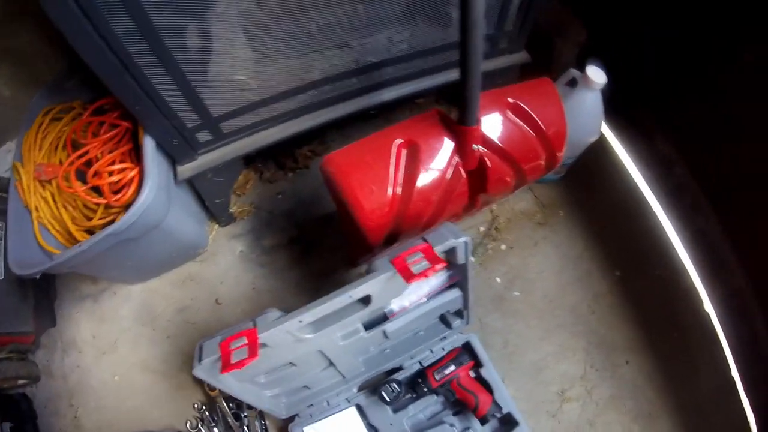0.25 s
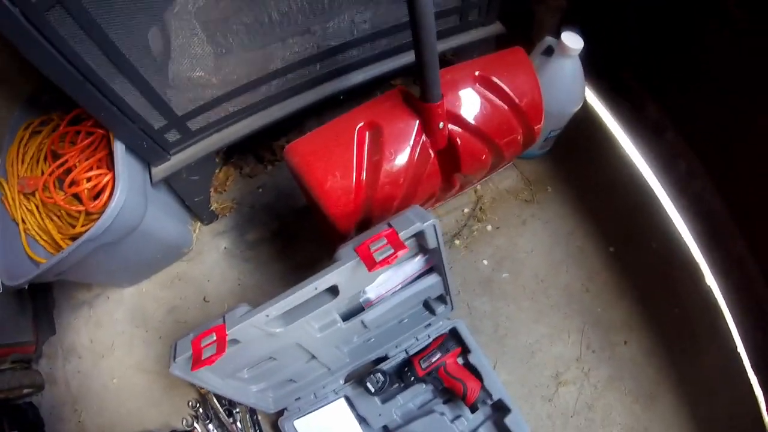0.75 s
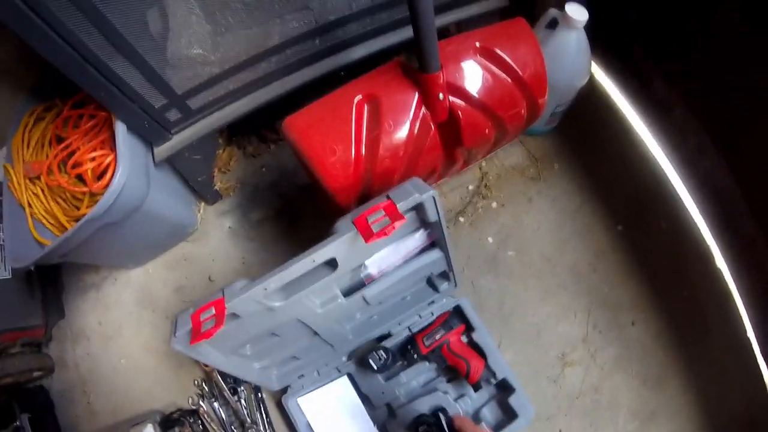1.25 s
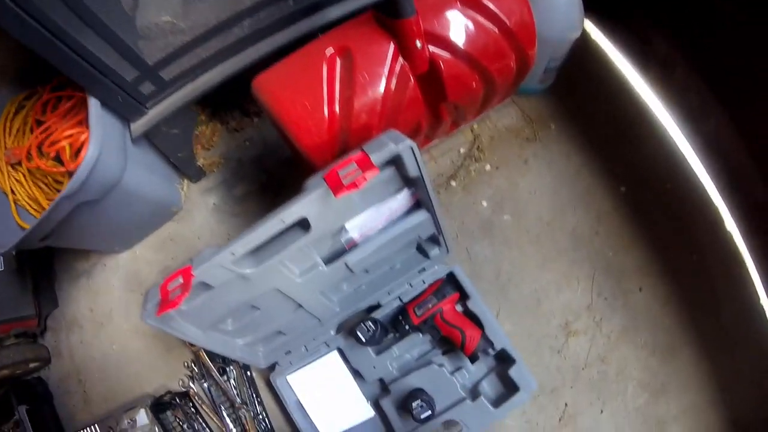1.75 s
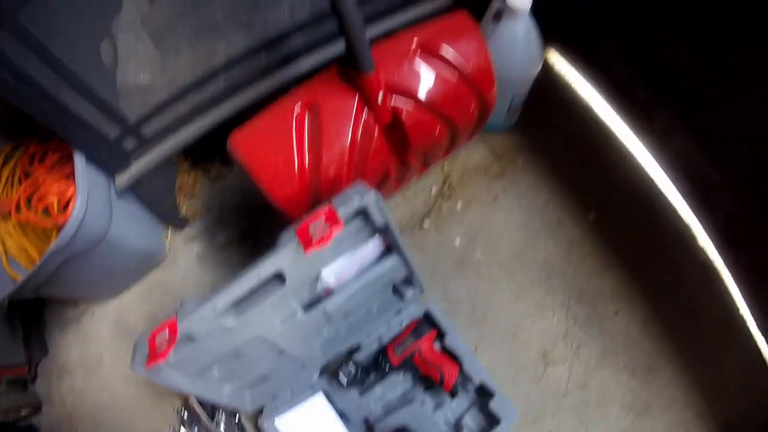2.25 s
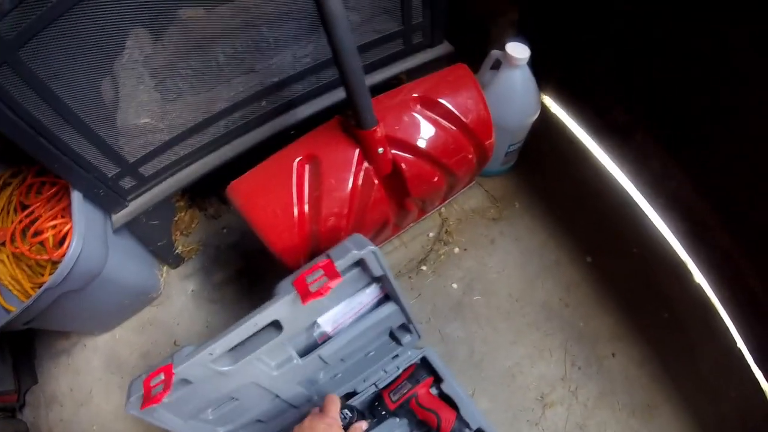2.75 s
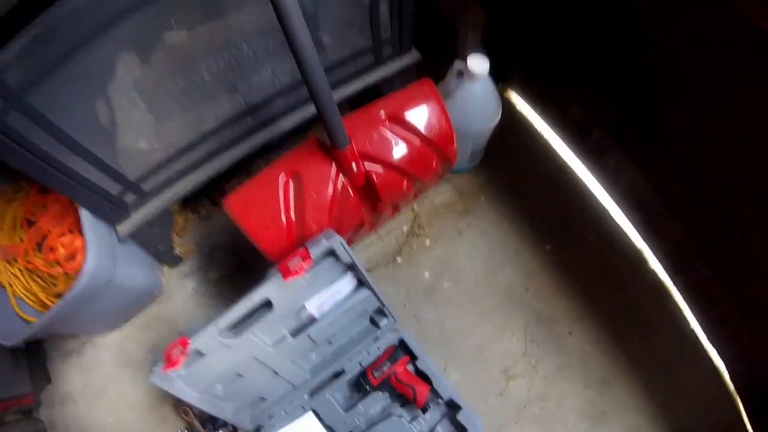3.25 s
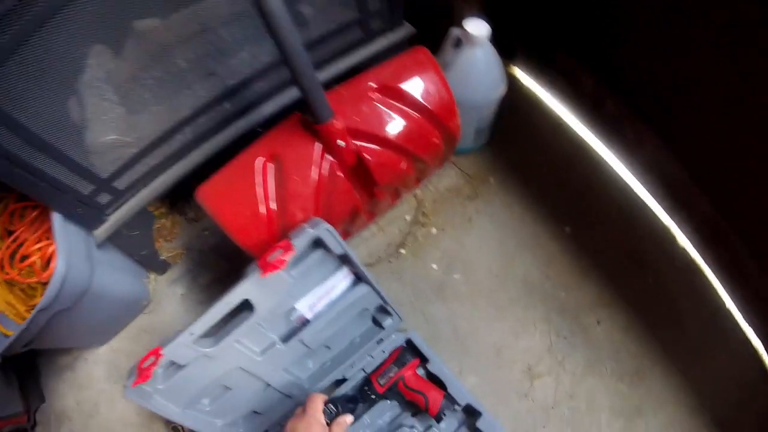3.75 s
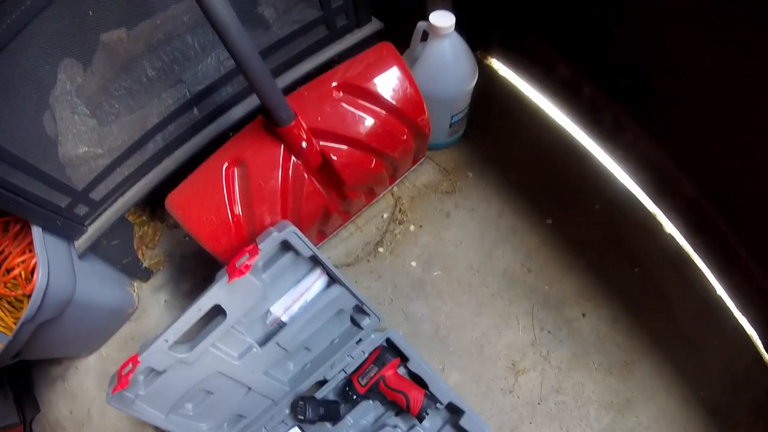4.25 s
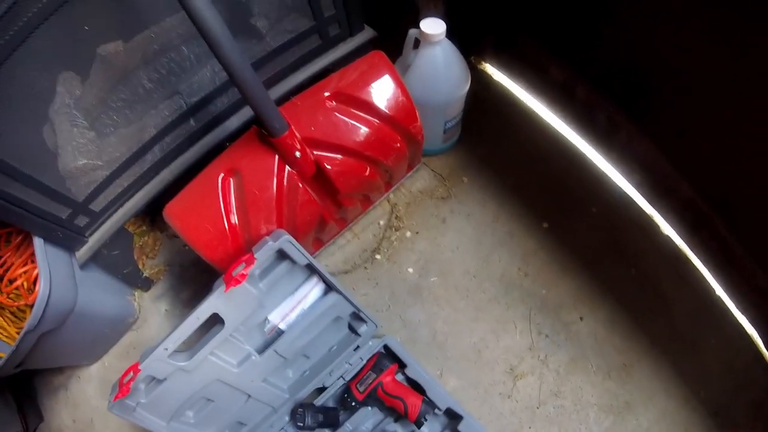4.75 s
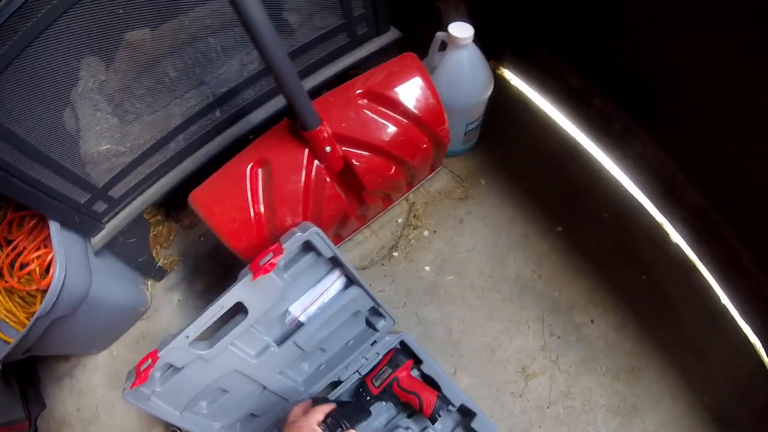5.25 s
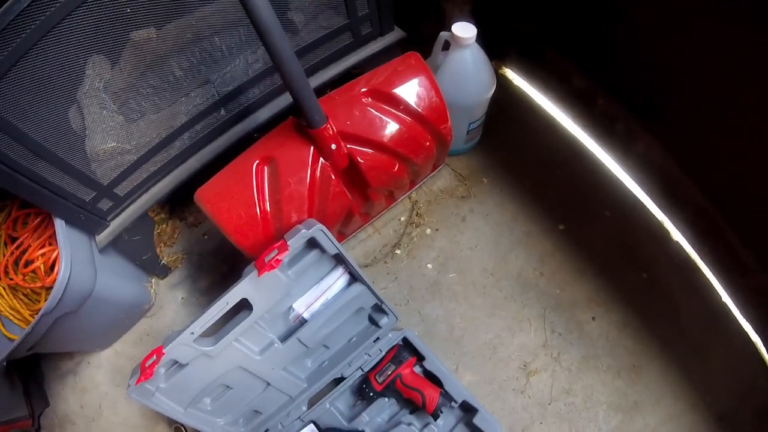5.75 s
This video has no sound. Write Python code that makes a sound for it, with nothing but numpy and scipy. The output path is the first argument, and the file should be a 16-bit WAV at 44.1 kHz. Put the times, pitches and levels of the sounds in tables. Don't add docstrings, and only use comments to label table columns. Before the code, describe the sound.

Metal sockets clink faintly, then tools knock hard and hollow against an open plastic case in a concrete garage, ending in a scraping drag and thump.

```python
import sys
import numpy as np
from scipy import signal
from scipy.fft import rfft, irfft, next_fast_len
from scipy.io import wavfile
from scipy.ndimage import uniform_filter1d

SR = 44100
rng = np.random.default_rng(int(sys.argv[2]) if len(sys.argv) > 2 else 0)


def boost_factor(decibels):
    exponent = np.asarray(decibels, float) / 20
    return 10 ** exponent


def digitize_waveform(pressure):
    field = np.atleast_2d(pressure).T
    bounded = np.clip(field, -1, 1)
    quanta = np.round(bounded * 32767).astype(np.int16)
    wavfile.write(sys.argv[1], SR, quanta)


N = 265349

# (frequency [Hz], level [dB])
WALL_MODES = [(120, -3), (182, -4), (245, 0), (317, -1.5), (363, -2.5), (410, -5), (480, -5.5), (630, -3.5),
              (670, -4), (770, -6), (870, -10), (1010, -10)]
# (frequency [Hz], level [dB])
CRACK_COLOUR = [(1500, -38), (2500, 7), (3500, 4.5), (4500, 2), (6500, -4.5), (7500, -10.5), (10000, -20.5),
                (13000, -60)]
# (time [s], boom peak [dB], boom pitch [Hz], hardness [dB])
RIM_BLOWS = [
    (2.404, -24, 340, -30.5),
    (2.568, -30.5, 360, -11.5),
    (2.697, -36, 346.3, -33.5),
    (4.588, -37, 380, -20),
    (5.529, -34.5, 414, -14),
]
# (time [s], boom peak [dB], boom pitch [Hz], hardness [dB])
RIB_BLOWS = [(2.137, -24, 235, -29), (2.164, -30.5, 644, -21), (2.349, -16, 294, -4),
             (2.417, -26.5, 606, -2.5), (3.014, -38, 215, -13), (3.257, -23, 182, -26.5),
             (3.318, -32, 167, -27), (3.97, -24, 233, -28), (4.069, -34.5, 307, -14), (4.73, -33, 350, -56)]
# (time [s], boom peak [dB], boom pitch [Hz], hardness [dB])
WALL_BLOWS = [(0.002, -35.5, 296, -1), (2.054, -7.5, 335.2, -4), (2.111, -14, 334, -7),
              (2.72, -38, 360, -16), (2.828, -40, 603, -11), (3.21, -27, 460, -23.5),
              (3.741, -8.5, 172, -12), (3.759, -11, 339.3, -15), (3.815, -21.5, 147, -4.5),
              (3.95, -22, 337, -8.5), (4.247, -41.5, 356, -33), (4.598, -27.5, 310, -11),
              (5.243, -28, 260, -12.5), (5.396, -23, 368, -22), (5.676, -34, 180, 4.5),
              (5.739, -25.5, 249, -20.5), (6, -14.5, 340, -29)]
# (time [s], boom peak [dB], boom pitch [Hz], hardness [dB])
HOLLOW_BLOWS = [(2.915, -30.5, 370, -21), (2.932, -23.5, 366, -14), (4.006, -23, 337, -10),
                (4.033, -24.5, 320, -21), (4.215, -36, 388.6, -16), (4.494, -45, 348, -44),
                (4.618, -28.5, 256, -15), (4.698, -24.5, 398, -16), (5.216, -28.5, 233.4, -20),
                (5.282, -26, 430, -21), (5.376, -22, 295, -18.5), (5.427, -26.5, 292, -20.5),
                (5.501, -19, 312, -6.5), (5.558, -29.5, 263, -12.5), (5.71, -19.5, 339, -18),
                (5.943, -6, 350, -17)]


def blows():
    # (blows, rib knock re boom [dB], boom t60 [s])
    places = [(RIM_BLOWS, 5.9, 0.16), (RIB_BLOWS, 0.49, 0.12), (WALL_BLOWS, -4, 0.13), (HOLLOW_BLOWS, -9.5, 0.1)]
    events = sorted((*row, *rule) for rows, *rule in places for row in rows)
    track = np.zeros(N + 2 * SR)
    t = np.arange(SR // 4) / SR
    for s, db, hz, crack_db, place_db, t60 in events:
        knock_db = place_db + 0.39 * crack_db
        soft = boost_factor(-0.6 * crack_db)
        boom = wall_boom(t, hz, knock_db, t60, soft)
        knock = burst(t, ribs, t60=0.067, attack=0.00042 * soft)
        crack = burst(t, crack_response, t60=0.036, attack=0.00067 * soft)
        hit = boom * boost_factor([[0], [-6]])
        hit = hit + boost_factor(knock_db + 1.5) * knock + boost_factor(crack_db + 1.5) * crack
        add(track, s, boost_factor(db - 3.5) * in_garage(*hit, wet_db=-7))
    stiff = signal.butter(4, 135, "high", fs=SR, output="sos")
    dull = signal.butter(3, 9000, fs=SR, output="sos")
    return signal.sosfilt(np.vstack([stiff, dull]), track[:N])


def wall_boom(t, hz, knock_db, t60, soft):
    t = t[:, None]
    mode_hz, mode_db = np.transpose(WALL_MODES)
    detune, phase, uneven = rng.standard_normal((3, len(WALL_MODES)))
    near_db = -6 * np.abs(np.log2(mode_hz / hz))
    near_db = near_db - 7 * np.clip(np.log2(hz / mode_hz), 0, None) ** 2
    near_db = near_db + 5 * (np.abs(mode_hz / hz - 1) < 0.06)
    hard_db = 0.59 * (knock_db + 12) * np.log2(mode_hz / 300)
    life = t60 * (mode_hz / 300) ** -0.15
    rings = np.sin(2 * np.pi * mode_hz * (1 + 0.012 * detune) * t + 0.8 * phase)
    gain = boost_factor(mode_db + near_db + hard_db + 1.9 * uneven - 60 * t / life)
    boom = (gain * rings).sum(axis=1)
    return crest(boom * (1 - np.exp(-t[:, 0] / (0.00027 * soft))))


def crack_response(f):
    return port(f) * boost_factor(along(CRACK_COLOUR, f))


# (frequency [Hz], width [Hz], level [dB])
RIB_MODES = [(793, 120, 6), (1050, 280, 4.5), (1410, 216, 4), (1680, 210, 1.5), (1945, 170, -1.5),
             (2274, 32, -2.5), (2800, 29, -29)]


def ribs(f):
    peaks = 0
    for k, (hz, width, db) in enumerate(RIB_MODES):
        resonance = 1j * f * width / (hz * hz - f * f + 1j * f * width)
        peaks = peaks + (-1) ** k * boost_factor(db) * resonance
    plate = boost_factor(along([(500, -30), (850, 0), (3000, 0), (4200, -25)], f))
    return (np.abs(peaks) + 0.3) * plate


# (time [s], peak level [dB], ring pitch [Hz])
FREE_PARTS = [
    (0.0203, -45, 1630),
    (0.163, -53, 6600),
    (1.0335, -43, 7880),
    (2.7515, -47, 6530),
    (2.8302, -54, 6310),
    (4.047, -48, 6240),
]
# (time [s], peak level [dB], ring pitch [Hz])
SMALL_SOCKETS = [
    (0.1072, -48, 3600),
    (1.286, -49, 6500),
    (1.9021, -57, 6500),
    (3.4964, -55.5, 6350),
]
# (time [s], peak level [dB], ring pitch [Hz])
MIDDLE_SOCKETS = [(0.2956, -48.5, 4980), (0.3486, -55, 5130), (0.3885, -50.5, 5120), (0.4804, -49.5, 5100),
                  (1.2266, -52, 5150), (1.934, -54, 4800), (3.7404, -31, 4700), (4.8753, -59, 4940),
                  (4.9646, -61, 5100), (4.9846, -66, 5160), (5.2859, -50, 4630)]
# (time [s], peak level [dB], ring pitch [Hz])
LARGE_SOCKETS = [
    (0.0398, -56, 3400),
    (1.0253, -40.5, 2800),
    (1.03, -38, 3780),
    (1.0933, -49.5, 3270),
    (1.2351, -57, 3400),
    (1.3094, -63, 2660),
    (4.9, -53.5, 3810),
    (5.2445, -40, 3510),
    (5.6311, -46, 2730),
]


def ticks():
    # (ticks, click re ring [dB], ring t60 [s])
    parts = [(FREE_PARTS, -22, 0.043), (SMALL_SOCKETS, 6.8, 0.016),
             (MIDDLE_SOCKETS, -1, 0.028), (LARGE_SOCKETS, 4.9, 0.027)]
    colour = [(0.2, -9.5), (0.45, 0.5), (1.05, 3), (2.2, -5.5), (3.5, -43)]  # (frequency over pitch, dB)
    faint = boost_factor([[0], [-8]])
    track = np.zeros(N + 2 * SR)
    t = np.arange(SR // 6) / SR
    for s, db, hz, click_db, t60 in [(*row, *rule) for rows, *rule in parts for row in rows]:
        click = burst(t, lambda f: port(f) * boost_factor(along(colour, f / hz)), t60=0.034, attack=0.00019)
        hit = faint * ring(t, hz, t60) + boost_factor(click_db) * click
        add(track, s, boost_factor(db - 4) * in_garage(*hit, wet_db=-5.5))
    return track[:N]


def ring(t, hz, t60):
    pair_hz = hz * (1 + rng.normal(0, 0.029))
    pair = np.sin(2 * np.pi * hz * t) + 0.58 * np.sin(2 * np.pi * pair_hz * t)
    return boost_factor(-60 * t / t60) * pair * (1 - np.exp(-t / 0.0012))


# (time [s], peak level [dB], ring gain beside a click at -12 [dB], share of the
# upper modes [dB])
WRENCH_KNOCKS = [
    (5.02, -44, -14, -9),
    (5.068, -40.5, -9.5, 4),
    (5.1904, -38, -13.5, -12),
    (5.313, -33, -22.5, -3),
]
# (frequency [Hz], t60 [s], level [dB], width over frequency [1])
HEAD_MODES = [(3270, 0.03, 0.3, 0.053), (4980, 0.025, -1.2, 0.017), (6900, 0.019, -8.5, .03),
              (11000, 0.036, -17, .02)]


def wrench():
    click_colour = [(2200, -1), (3000, -8), (7000, 3), (12000, -12)]  # (Hz, dB)
    faint = boost_factor([[0], [-8]])
    track = np.zeros(N + 2 * SR)
    t = np.arange(SR // 6) / SR
    for s, db, ring_db, upper_db in WRENCH_KNOCKS:
        head = 0
        for k, (hz, t60, mode_db, width) in enumerate(HEAD_MODES):
            mode = burst(t, lambda f: 1 / (1 + ((f / hz - 1) / width) ** 2), t60=t60, attack=0.00048)
            head = head + boost_factor(ring_db + mode_db + upper_db * (k > 0)) * mode
        click = burst(t, lambda f: boost_factor(along(click_colour, f)), t60=0.018, attack=0.00036)
        hit = faint * head + boost_factor(-12) * click
        add(track, s, boost_factor(db + 4) * in_garage(*hit, wet_db=-3))
    return track[:N]


# (frequency [Hz], width [Hz], level [dB])
BAR_MODES = [(810, 48, -4), (1630, 124, 2.5), (3170, 190, -5), (4800, 110, -15)]


def bar():
    t = np.arange(SR // 3) / SR
    modes = lambda f: sum(boost_factor(db) / (1 + ((f - hz) / width) ** 2) for hz, width, db in BAR_MODES)
    chatter = boost_factor(-41) * burst(t, modes, t60=0.31, attack=0.00052)[0]
    return np.pad(chatter, (0, N - len(t)))


# (time [s], level [dB])
SLIDE_LEVEL = [
    (5.78, -87),
    (5.824, -62.5),
    (5.874, -45.5),
    (5.934, -41.5),
    (5.95, -27),
]
# (frequency [Hz], level [dB per Hz])
DRAG_COLOUR = [(180, -32), (300, 0), (480, -16), (545, -6), (695, -5.5), (1240, -12), (1700, -3),
               (2230, -14.5), (3010, -8), (4290, -23), (4950, -14), (9000, -29.5), (11700, -52),
               (19800, -120)]


def slide():
    times, db = np.transpose(SLIDE_LEVEL)
    gain = boost_factor(np.interp(np.arange(N) / SR, times, db, left=-120, right=-120))
    return boost_factor(-3.5) * gain * grit(lambda f: boost_factor(along(DRAG_COLOUR, f)), rough_db=2, size=130)


# (start [s], length [s], rumble level [dB], grit re rumble [dB])
TOOL_RUBS = [
    (2.836, 0.26, -45, -13.5),
    (3.263, 0.27, -54, -9),
    (3.91, 0.23, -41, -9.5),
    (4.55, 0.32, -49, -16.5),
    (5.163, 0.26, -50, -4.5),
    (5.344, 0.29, -47, -4),
    (5.47, 0.27, -48, -3),
    (5.765, 0.22, -53.5, -20),
]
# (start [s], length [s], level [dB])
CASE_SHOVES = [
    (2.857, 0.41, -61),
    (3.237, 0.19, -54),
    (3.924, 0.26, -44),
    (4.158, 0.18, -55.5),
    (4.446, 0.28, -55),
    (5.2, .25, -51.5),
    (5.375, 0.32, -41.5),
]


def shuffle():
    def walls(f):
        power = sum(boost_factor(2 * db) / (1 + ((f - hz) / 18) ** 2) ** 2 for hz, db in WALL_MODES[1:])
        return np.sqrt(power)

    rumble = grit(walls, rough_db=-1, size=500)
    thump = grit(lambda f: 1 / (1 + ((f - 105) / 25) ** 2), rough_db=-4.5, size=900)
    rustle = grit(ribs, rough_db=4, size=150)
    start, length, rumble_db, grit_db = np.transpose(TOOL_RUBS)
    rubbing = strokes(start, length, rumble_db) * rumble
    rubbing = rubbing + strokes(start, length, rumble_db + grit_db) * rustle
    return rubbing + strokes(*np.transpose(CASE_SHOVES)) * thump


def strokes(start, length, peak_db):
    t = np.arange(N) / SR
    rise_share, edge_db = 0.34, -16
    power = 0
    for s, span, db in zip(start, length, peak_db):
        shape_db = np.interp((t - s) / span, [-0.05, 0, rise_share, 1, 1.3], [-90, edge_db, 0, edge_db, -90])
        power = power + boost_factor(db + shape_db) ** 2
    return np.sqrt(power)


# (frequency [Hz], level [dB per Hz])
NOISE_COLOUR = [(9, -22), (15, -1.5), (47, -4), (87, -16), (266, -26), (840, -33), (1410, -34.5),
                (3000, -38.5), (4500, -47.5), (6500, -39.5), (8500, -39), (10300, -49), (12200, -45.5),
                (14000, -56)]


def floor():
    z = signal.stft(rng.standard_normal(N), nperseg=512)[2]
    field = uniform_filter1d(rng.standard_normal(z.shape), size=6, axis=0)
    field = uniform_filter1d(field, size=14, axis=1)
    noise = signal.istft(z * boost_factor(0.5 * unit(field)), nperseg=512)[1][:N]
    return boost_factor(-55) * unit(filtered(noise, lambda f: port(f) * boost_factor(along(NOISE_COLOUR, f))))


# (frequency [Hz], t60 [s])
GARAGE_DECAY = [(100, 0.48), (300, 0.63), (1000, 0.5), (3000, 0.34), (8000, 0.25)]


def in_garage(sound, feed, wet_db):
    hz, t, z = signal.stft(rng.standard_normal(SR // 2), SR, nperseg=256)
    decay = boost_factor(-60 * t / along(GARAGE_DECAY, hz)[:, None])
    tail = signal.istft(z * decay, SR, nperseg=256)[1]
    tail = tail * np.clip(np.arange(len(tail)) / SR / 0.0055, 0, 1)
    wet = boost_factor(wet_db) * signal.fftconvolve(feed, tail / np.linalg.norm(tail))
    return wet + np.pad(sound, (0, len(wet) - len(sound)))


def port(f):
    hz, width, db = 6560, 480, 9.16
    return 1 + (boost_factor(db) - 1) / (1 + (2 * (f - hz) / width) ** 2)


def burst(t, colour, t60, attack):
    uneven = boost_factor(2.75 * unit(uniform_filter1d(rng.standard_normal(len(t)), size=60)))
    noise = uneven * rng.standard_normal(len(t)) * boost_factor(-60 * t / t60) * (1 - np.exp(-t / attack))
    direct = crest(filtered(noise, colour))
    impulse = 1.0 * (np.arange(len(t)) == SR // 200)
    pulse = filtered(impulse, colour)
    return np.array([direct, pulse * np.linalg.norm(direct) / np.linalg.norm(pulse)])


def grit(colour, rough_db, size):
    uneven = unit(uniform_filter1d(rng.standard_normal(N), size=size))
    grains = rng.standard_normal(N) * boost_factor(rough_db * uneven)
    return unit(filtered(grains, colour))


def unit(x):
    return x / np.sqrt(np.mean(x ** 2) + 1e-20)


def crest(x):
    return x / np.max(np.abs(x))


def along(points, hz):
    f, v = np.transpose(points)
    return np.interp(np.log(hz + 1), np.log(f + 1), v)


def filtered(x, response):
    m = next_fast_len(len(x) + 4096)
    return irfft(rfft(x, m) * response(np.fft.rfftfreq(m, 1 / SR)), m)[:len(x)]


def add(track, s, sound):
    track[round(s * SR):][:len(sound)] += sound


def scene():
    mono = blows() + ticks() + wrench() + bar() + slide() + shuffle() + floor()
    mono = mono * np.clip((N - np.arange(N)) / SR / 0.003, 0, 1)
    return np.array([2 * mono, 0 * mono])


def low_pass(x):
    return signal.sosfilt(signal.butter(12, 14500, fs=SR, output="sos"), x)


def record(dry):
    return low_pass(dry)


dry = scene()
out = record(dry)
digitize_waveform(out)
```